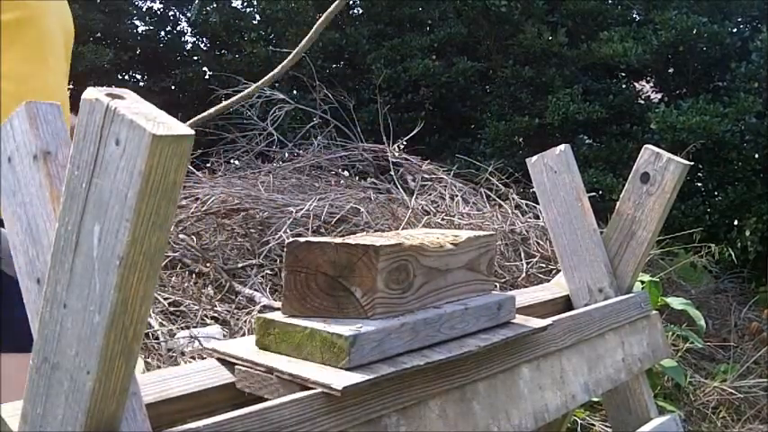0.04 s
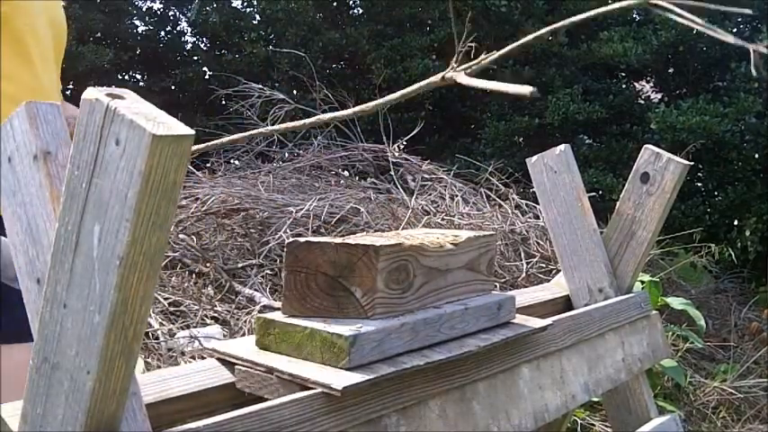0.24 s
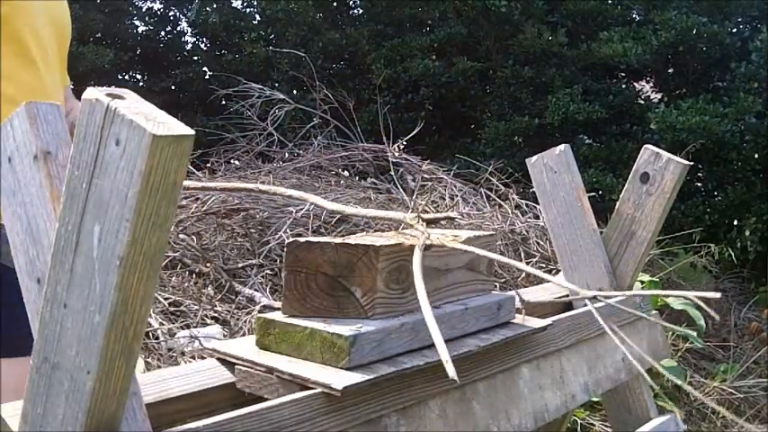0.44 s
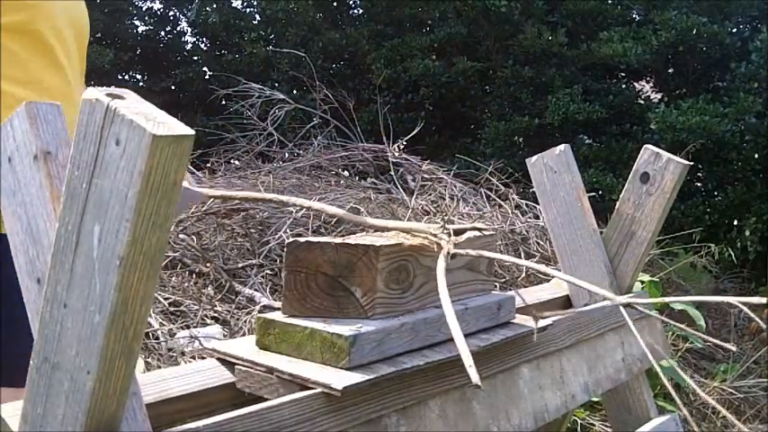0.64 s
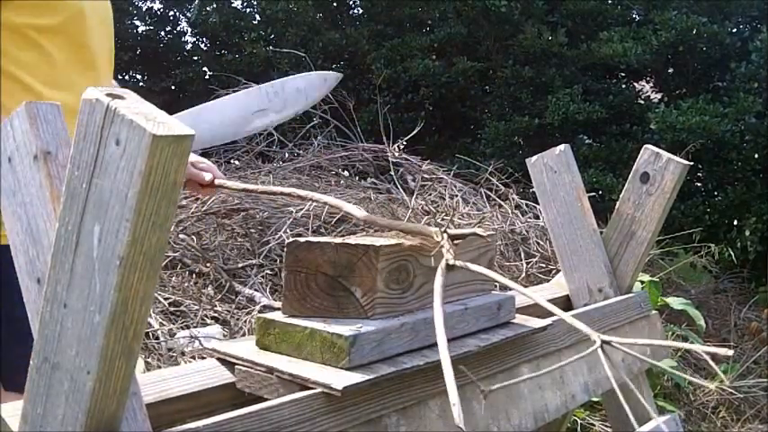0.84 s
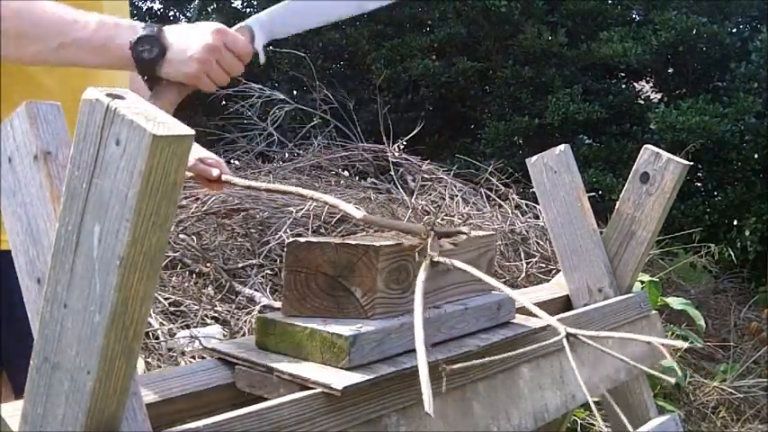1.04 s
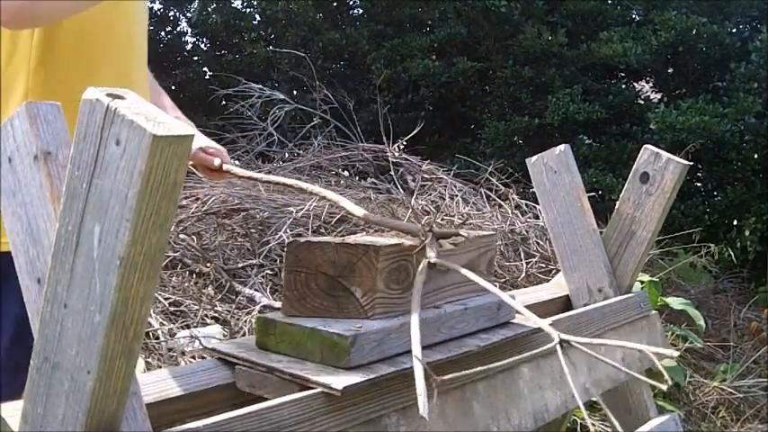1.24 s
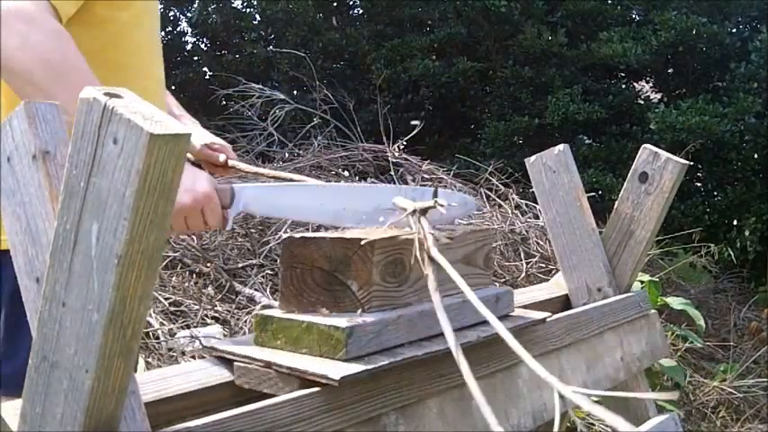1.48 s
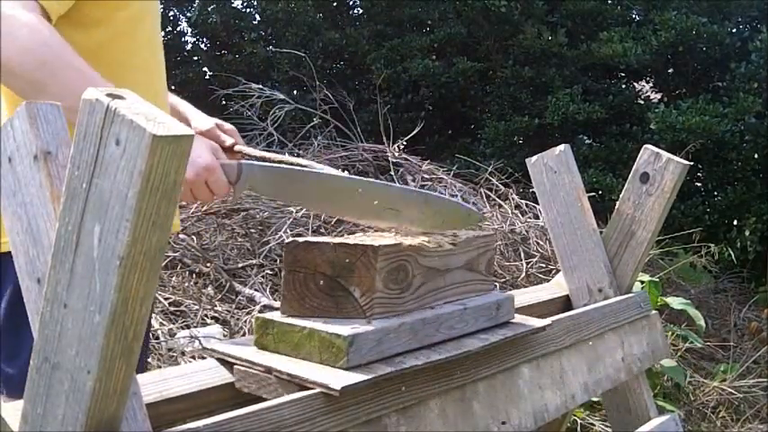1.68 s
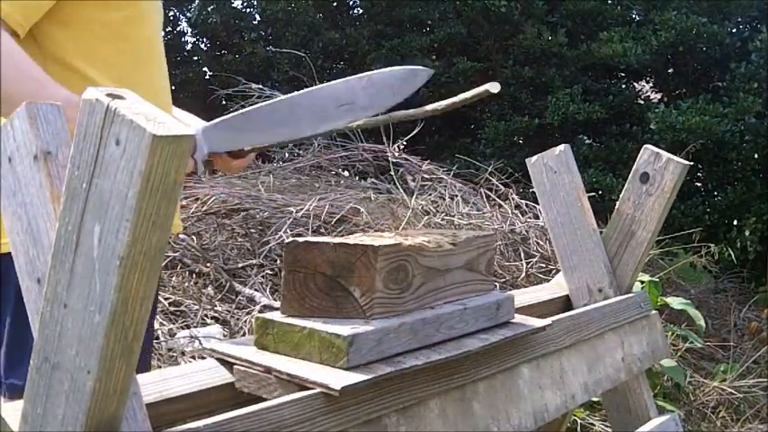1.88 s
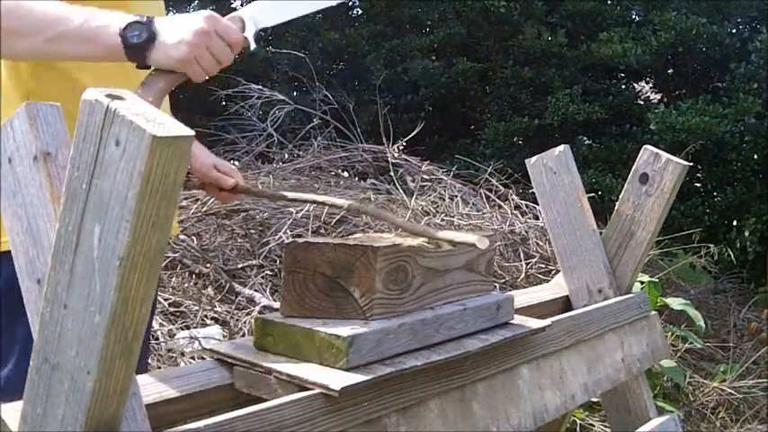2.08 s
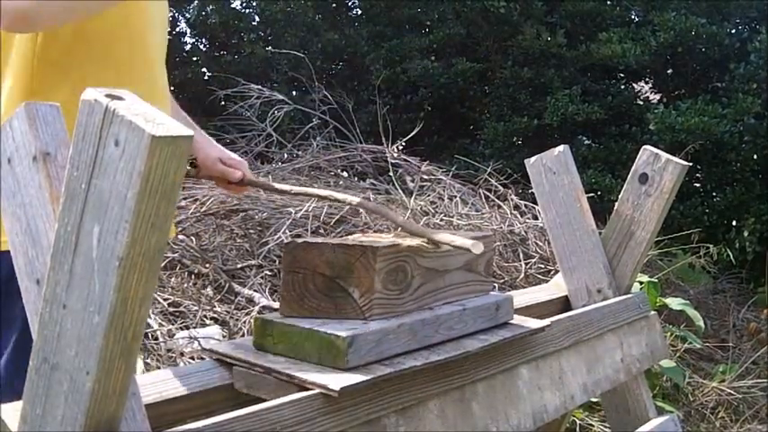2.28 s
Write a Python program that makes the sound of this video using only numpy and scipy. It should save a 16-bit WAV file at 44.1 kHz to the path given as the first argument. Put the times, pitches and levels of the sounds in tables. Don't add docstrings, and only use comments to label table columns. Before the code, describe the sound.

A large knife chops a dry stick on a wooden block: one loud, sharp, slightly distorted crack at 1.57 s. Before it, far traffic, faint hiss, dry rustling, a light twig tap at 0.53 s and faint bird whistles. Soft bumps follow; from 1.9 s twigs tick, hollow plank thuds start near 2.03 s, a hard knock lands at 2.09 s, then clatter and crackling to the end.

```python
import sys
import numpy as np
from scipy import signal
from scipy.fft import rfft, irfft
from scipy.io import wavfile
from scipy.ndimage import uniform_filter1d

SR = 44100
rng = np.random.default_rng(int(sys.argv[2]) if len(sys.argv) > 2 else 0)


def wrap_up_sound(samples):
    columns = np.atleast_2d(samples).T
    tamed = np.clip(columns, -1, 1)
    steps = np.round(tamed * 32767).astype(np.int16)
    wavfile.write(sys.argv[1], SR, steps)


def invert_db(level):
    return 10 ** (np.asarray(level, dtype=float) / 20)


N = 102135
T = np.arange(N) / SR
CHOP_S = 1.5692

# (frequency [Hz], level [dB], decay T60 [s])
PLANKS = [(297, -2, 0.029), (448.6, -2, 0.11), (600, -2.5, 0.13), (750, -7.5, 0.11), (892, 2, 0.079),
          (966, 7, 0.016)]


def unit(x):
    return x / np.sqrt(np.mean(x ** 2) + 1e-30)


def curve(rows):
    return np.interp(T, *np.array(rows).T[:2])


def colour(x, points):
    hz, db = np.array(points).T
    f = np.fft.rfftfreq(len(x), 1 / SR) + 1e-3
    gain_db = np.interp(np.log(f), np.log(hz), db, left=-90, right=-90)
    return unit(irfft(rfft(x) * invert_db(gain_db), len(x)))


def ring(force, modes):
    out = np.zeros(len(force))
    for k, (hz, db, t60_s) in enumerate(modes):
        r = np.exp(-np.log(1000) / (max(t60_s, .003) * SR))
        w = 2 * np.pi * hz / SR
        mode = signal.lfilter([0, np.sin(w)], [1, -2 * r * np.cos(w), r * r], force)
        out += (-1) ** k * invert_db(db) * mode
    return out


def add(track, s, db, sound):
    i = int(s * SR)
    part = sound[:N - i]
    track[i:i + len(part)] += part * invert_db(db) / np.abs(sound).max()


def clicks(size, per_s, scatter_db):
    chance, sign, height = rng.random((3, size))
    return (chance < per_s / SR) * np.sign(sign - .5) * invert_db(-scatter_db * np.log(height + 1e-9))


def fade(size, hold_s, t60_s):
    t = np.arange(size) / SR
    return np.minimum(t / .0005, 1) * invert_db(-60 * np.maximum(t - hold_s, 0) / t60_s)


def walk(rate_hz):
    k = int(SR / rate_hz)
    steps = np.repeat(rng.standard_normal(N // k + 1), k)
    return unit(uniform_filter1d(steps, k)[:N])


def blow(track, s, db, hold_s, splits, modes, crack_db, crack_t60_s, top_db):
    # (frequency [Hz], density [dB per Hz])
    crack_points = [(400, -18), (900, -5.5), (1600, -4.5), (2400, -3), (4000, -7), (6000, -10.5),
                    (7200, -23), (7600, -40)]
    # (frequency [Hz], density [dB per Hz])
    hard_points = [(8300, -27), (9600, -6), (12500, 1), (15000, 2), (15800, -20)]
    n = SR // 3
    force = clicks(n, 3000, 3.3) * fade(n, 0.002, 0.039) * 0.38
    for k, (late_s, split_db) in enumerate(splits):
        force[int(late_s * SR)] = (-1) ** k * invert_db(split_db)
    crack = colour(rng.standard_normal(n), crack_points) * fade(n, hold_s, crack_t60_s)
    top = colour(rng.standard_normal(n), hard_points) * fade(n, 0.0013, 0.012)
    add(track, s, db, ring(force, modes))
    add(track, s, db + crack_db, crack)
    add(track, s, db + top_db, top)


def chop(track):
    # (frequency [Hz], level [dB], decay T60 [s])
    block_modes = [(1313, -8, .04), (1460, -5, .028), (1810, -14, 0.016), (2040, -0.5, 0.017),
                   (2280, -1.5, 0.022), (2590, -3, 0.017), (3815, 0, 0.0095), (4345, -4, .014),
                   (5200, -20, 0.011), (5830, -17, .012)]
    # (frequency [Hz], level [dB], decay T60 [s])
    blade_modes = [(4000, -24, .2), (5120, -33, .1)]
    # (time after contact [s], level [dB])
    chop_splits = [
        (0, 3.5),
        (.0013, -2.5),
        (.0026, -11),
        (.0062, -8),
        (.0083, -5),
        (0.011, -21),
    ]
    blow(track, CHOP_S, -2, hold_s=0.0023, splits=chop_splits, modes=block_modes + blade_modes,
         crack_db=3, crack_t60_s=0.023, top_db=-15)


def block_and_trestle(track):
    # (frequency [Hz], level [dB], decay T60 [s])
    body_modes = [(437, 0, 0.059), (620, 3, 0.046), (290, -6, 0.028), (978, -3, 0.053), (147, -1, 0.018)]
    # (time after contact [s], level [dB])
    pushes = [
        (.0004, 5.5),
        (.0062, -1),
        (.0085, -4),
    ]
    force = np.zeros(SR // 5)
    for late_s, db in pushes:
        force[int(late_s * SR)] = invert_db(db)
    add(track, CHOP_S, -4, ring(uniform_filter1d(force, size=12, origin=-6), body_modes))


def knock(track):
    # (frequency [Hz], level [dB], decay T60 [s])
    branch_modes = [(1022, 7.5, 0.027), (1287, 5.5, 0.017), (1500, -0.5, 0.013), (1940, 4.5, 0.0099),
                    (2250, 7, 0.015), (2600, -9.5, 0.031), (2820, 0, 0.013), (3700, -4, 0.0065)]
    # (time after contact [s], level [dB])
    knock_splits = [
        (0, 6.5),
        (.0016, 3),
        (.0034, 1.5),
        (.0052, -1),
    ]
    blow(track, 2.0895, -1, hold_s=0.00195, splits=knock_splits, modes=branch_modes,
         crack_db=-6, crack_t60_s=0.017, top_db=-34)


def bumps(track):
    # (time [s], peak level [dB], pitch [Hz])
    bump_events = [(1.591, -20.5, 960), (1.616, -29, 990), (1.623, -33, 624), (1.657, -27, 812),
                   (1.66, -32, 461), (1.681, -36, 420), (1.681, -37, 892), (1.692, -31.5, 680),
                   (1.697, -29.5, 416), (1.702, -31, 1100), (1.706, -33, 565), (1.714, -31, 910),
                   (1.717, -28, 490), (1.731, -36.5, 830), (1.739, -37, 694), (1.748, -43, 830),
                   (1.75, -29.5, 1290), (1.758, -34, 1077), (1.767, -36, 457), (1.89, -30, 1160),
                   (1.952, -34.5, 627), (1.958, -37, 242), (1.96, -45, 1183), (1.968, -37, 1310),
                   (1.969, -44, 812), (1.979, -27, 288), (1.986, -21.5, 607), (1.993, -32, 217),
                   (2.007, -29, 567), (2.007, -51, 1183), (2.029, -16.5, 1050), (2.03, -7, 589),
                   (2.034, -11.5, 340.5), (2.051, -11.5, 310), (2.054, -17.5, 678), (2.06, -15, 667),
                   (2.08, -22.5, 262), (2.09, -25, 348), (2.11, -21, 1020), (2.12, -30, 184),
                   (2.125, -18.5, 780), (2.126, -21, 347), (2.139, -23, 340), (2.139, -19, 592),
                   (2.153, -29, 382), (2.174, -23, 612), (2.179, -25.5, 237), (2.184, -25, 375),
                   (2.195, -28, 812), (2.195, -25, 384), (2.198, -39, 198), (2.214, -27, 845),
                   (2.214, -25, 372), (2.226, -33, 785), (2.24, -28.5, 372), (2.257, -28.5, 853),
                   (2.275, -22, 420), (2.288, -20.5, 501), (2.297, -20.5, 492),
                   (1.6, -26.5, 617), (1.666, -25.5, 980), (2.021, -18, 783), (2.025, -12, 585),
                   (2.038, -13, 621), (2.067, -26, 554), (2.074, -21.5, 620), (2.13, -21, 570),
                   (2.19, -21.5, 133), (2.268, -36, 110)]
    t = np.arange(SR // 6) / SR
    for s, db, hz in bump_events:
        push = np.sin(np.pi * np.minimum(t * hz / 1.4, 1)) * np.sin(2 * np.pi * hz * t)
        modes = [(hz, 0, min(25 / hz, .045))]
        for plank_hz, plank_db, t60_s in PLANKS:
            octaves_off = abs(np.log2(plank_hz / hz))
            modes.append((plank_hz, plank_db - 7 - 6 * octaves_off / 0.46, t60_s))
        add(track, s, db - 0.45, rng.choice([-1, 1]) * ring(push, modes))


def shudder():
    # (frequency [Hz], density [dB per Hz])
    trestle_points = [(70, 0), (450, 2), (900, -2.5), (1500, -6.5), (2600, -19.5)]
    # (time [s], level [dB])
    shudder_levels = [(1.6, -36), (1.77, -40), (1.81, -42.5), (1.93, -50.5), (1.95, -39.5), (2.05, -36.5),
                      (2.15, -38), (2.3, -33.5)]
    push = clicks(N, 1500, 2.1)
    planks = unit(ring(uniform_filter1d(push, size=10), PLANKS))
    wood = .5 * planks + colour(push, trestle_points)
    onset = np.clip((T - CHOP_S) / 0.011, 0, 1)
    return wood * invert_db(curve(shudder_levels) - 2.5 + 1.35 * walk(60)) * onset


def landing_rumble():
    # (frequency [Hz], density [dB per Hz])
    ground_points = [(25, 5), (60, -2), (130, 2.5), (260, -5.5)]
    onset = np.clip((T - 2.03) / 0.013, 0, 1)
    return colour(rng.standard_normal(N), ground_points) * invert_db(-35) * onset


def twig_noise(size, hz, above_db):
    points = [(hz * 0.38, -36), (hz * 0.58, -10.5), (hz, 0), (6300, above_db), (7500, -36)]
    return colour(rng.standard_normal(size), points)


def ticks(track):
    # (time [s], peak level [dB], pitch [Hz], contact [s])
    tick_events = [(.005, -26.5, 1270, 0.0025), (1.864, -28.5, 2600, 0.004), (1.997, -28, 4380, 0.003),
                   (0.5267, -20.5, 2910, 0.0073), (0.543, -30, 2670, 0.0034), (0.8032, -36, 4030, 0.0021),
                   (1.903, -45, 4500, 0.0017), (1.916, -15, 4780, 0.0028), (1.914, -15, 2950, 0.0046),
                   (1.9252, -21, 4530, 0.0033), (1.948, -19.5, 3120, 0.0069), (1.9694, -19.5, 4960, 0.005),
                   (2.0032, -17, 4000, 0.0063), (2.0228, -13, 4470, 0.0028), (2.0299, -14.5, 3670, 0.0028),
                   (2.1076, -29, 2050, 0.0031), (2.2207, -26.5, 3580, 0.016)]
    # (frequency [Hz], density [dB per Hz])
    top_points = [(7600, -8), (8500, 4.5), (9600, -6), (12500, 0.5), (15000, -12), (15700, -8)]
    n = SR // 10
    for s, db, hz, hold_s in tick_events:
        shape = fade(n, hold_s, 0.022)
        force = clicks(n, 3000, 1.05) * shape
        force[0] = 2
        modes = [(hz, 0, .012), (hz * 1.536, -5, .01), (hz * 0.723, -5, .012)]
        add(track, s, db - 8, ring(force, modes))
        add(track, s, db - 1, twig_noise(n, hz, above_db=-9) * shape)
        add(track, s, db - 24, colour(rng.standard_normal(n), top_points) * shape)


def snaps(track):
    # (time [s], peak level [dB], pitch [Hz])
    snap_events = [(.0047, -17.5, 3700), (.0058, -27, 2370), (.0092, -37, 2460), (0.712, -30, 3250),
                   (.7165, -48, 2600), (.7252, -49, 3400), (1.0665, -42, 2250), (1.1805, -39, 2500),
                   (1.977, -28, 3820), (2.0466, -29, 3870), (2.183, -37, 2920), (2.2231, -23, 3700),
                   (2.273, -29, 4000), (2.282, -30, 3700), (2.293, -25, 4240), (2.3008, -26, 5030),
                   (2.3088, -25, 4800), (2.311, -20.5, 3620)]
    n, t60_s, spread = SR // 40, 0.007, 1.232
    for s, db, hz in snap_events:
        force = clicks(n, 1700, 1.5) * fade(n, 0, t60_s) * 0.38
        force[0] = 1
        modes = [(hz, 0, t60_s), (hz * spread, -4, t60_s), (hz / spread, -3, t60_s)]
        add(track, s, db, np.diff(ring(force, modes)))


def scrapes(track):
    # (time [s], rms level [dB], pitch [Hz], length [s])
    scrape_events = [
        (.703, -40, 3000, .018),
        (1.173, -42, 1950, .034),
        (1.654, -46.5, 4170, .02),
        (1.857, -37, 2700, .04),
        (2.018, -30, 4300, .008),
        (2.036, -34, 4020, .024),
        (2.29, -39, 4200, .03),
    ]
    n = SR // 10
    for s, db, hz, length_s in scrape_events:
        u = np.clip(np.arange(n) / (length_s * SR), 0, 1)
        swell = np.sin(np.pi * u ** 0.5) ** 0.47
        add(track, s, db + 8.5, twig_noise(n, hz, above_db=-26) * swell)


def rustle():
    # (frequency [Hz], density [dB per Hz])
    leaf_points = [(900, -8.5), (2150, 4.5), (2800, 3.5), (4000, 0), (6300, -7), (7200, -19), (7700, -9)]
    # (time [s], level [dB])
    rustle_levels = [(0, -46), (.1, -50.5), (.4, -48.5), (.58, -48), (.64, -44), (.75, -44.5), (.86, -47),
                     (1.03, -50), (1.07, -45), (1.2, -47), (1.26, -51), (1.55, -50.5), (1.8, -47),
                     (1.9, -41), (2.04, -35.5), (2.08, -40.5), (2.2, -42), (2.31, -44)]
    grains = clicks(N, 3200, 0.5) + 0.13 * rng.standard_normal(N)
    return colour(grains, leaf_points) * invert_db(curve(rustle_levels) - 2 + walk(24.12))


def bird():
    # (time [s], length [s], start [Hz], end [Hz], level [dB])
    bird_notes = [
        (.122, .034, 3150, 2450, -50),
        (.217, .072, 2640, 3650, -50),
        (.313, .022, 3650, 3450, -55),
        (.372, .016, 3050, 3150, -54),
        (.412, .022, 3150, 2700, -54),
        (.455, .034, 3400, 2750, -57),
        (.597, .028, 2890, 3200, -52),
        (.91, .03, 2900, 3200, -52.5),
    ]
    out = np.zeros(N)
    for s, length_s, from_hz, to_hz, db in bird_notes:
        u = np.arange(int(length_s * SR)) / (length_s * SR)
        hz = from_hz + (to_hz - from_hz) * u ** 1.25
        whistle = np.sin(2 * np.pi * np.cumsum(hz) / SR)
        add(out, s, db + 2, np.sin(np.pi * u) ** 0.51 * whistle)
    return out * invert_db(1.5 * walk(130))


def traffic(gain_db):
    # (frequency [Hz], density [dB per Hz])
    air_points = [(30, -13), (50, 1), (130, -5.5), (300, -6), (600, -8), (2300, -16), (5500, -38),
                  (7500, -37)]
    return colour(rng.standard_normal(N), air_points) * invert_db(-47 + .6 * walk(5.45) + 0.36 * gain_db)


def engines():
    # (frequency [Hz], width [Hz], level [dB])
    drones = [(52, 13, -54), (115.3, 14.4, -52.5), (247, 13, -55)]
    out = np.zeros(N)
    for hz, width_hz, db in drones:
        out += invert_db(db) * unit(ring(rng.standard_normal(N), [(hz, 0, 2.95 / width_hz)]))
    return out


def hiss(gain_db):
    # (frequency [Hz], density [dB per Hz])
    hiss_points = [(6800, 2.5), (8100, -12), (8600, -4.5), (10200, 0.5), (14500, -0.5), (15400, -2)]
    return colour(rng.standard_normal(N), hiss_points) * invert_db(-61 + gain_db)


def background():
    # (time [s], level [dB])
    gain_levels = [
        (1.572, 0),
        (1.582, -22),
        (1.72, -19),
        (1.84, -1),
        (2.04, -1),
        (2.06, -7),
        (2.12, -8),
        (2.21, -1),
    ]
    gain_db = curve(gain_levels)
    return traffic(gain_db) + engines() + hiss(gain_db)


def scene():
    track = background() + rustle() + shudder() + landing_rumble() + bird()
    for source in (chop, knock, block_and_trestle, ticks, snaps, scrapes, bumps):
        source(track)
    return track[None]


def roll_off(x):
    return signal.sosfilt(signal.butter(12, 16540, fs=SR, output="sos"), x)


def record(dry):
    dip = signal.butter(1, (7250, 8050), "bandstop", fs=SR, output="sos")
    heard = signal.sosfilt(dip, dry)
    return roll_off(np.clip(heard, -1, 1))


dry = scene()
out = record(dry)
wrap_up_sound(out)
```